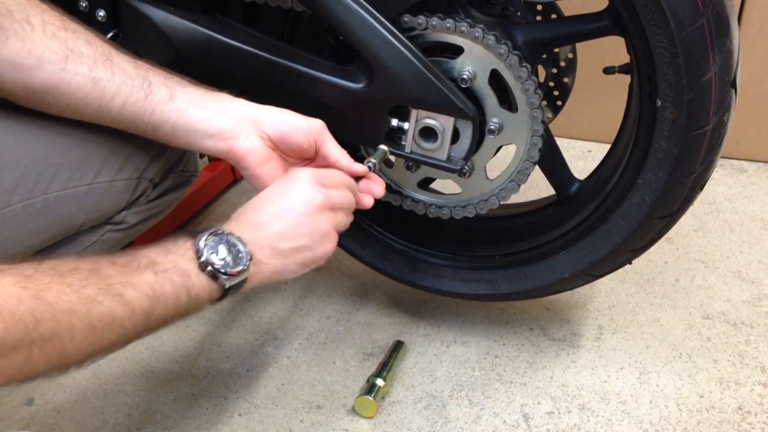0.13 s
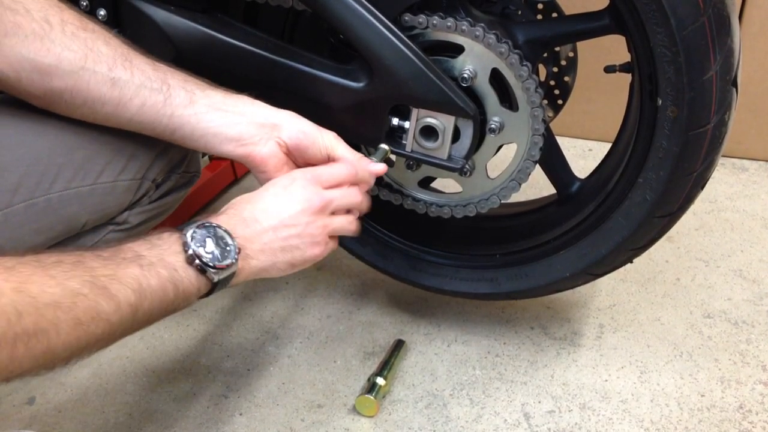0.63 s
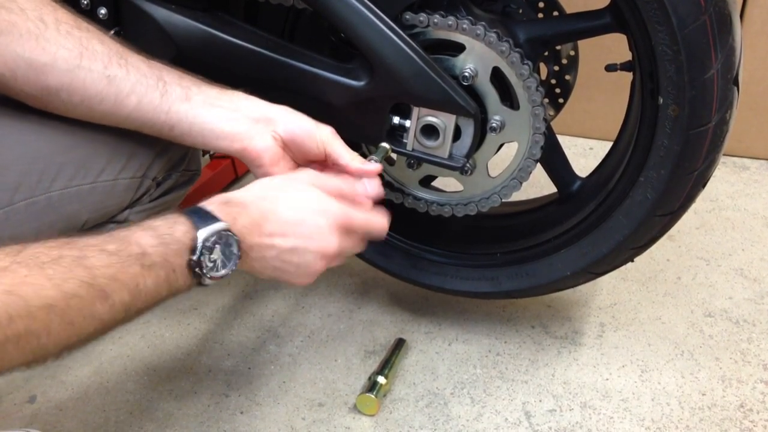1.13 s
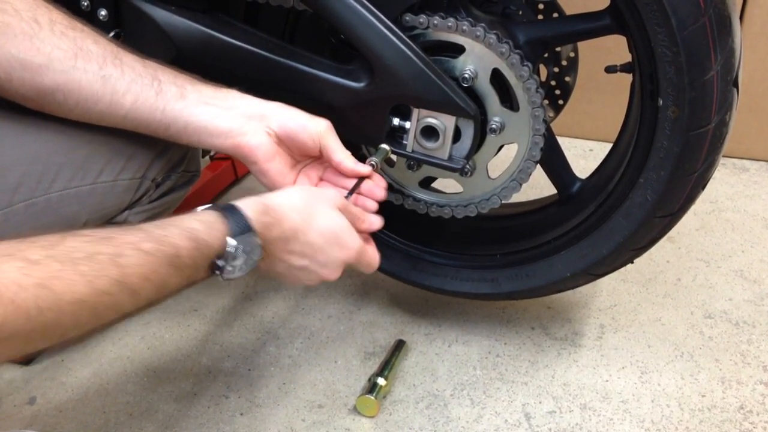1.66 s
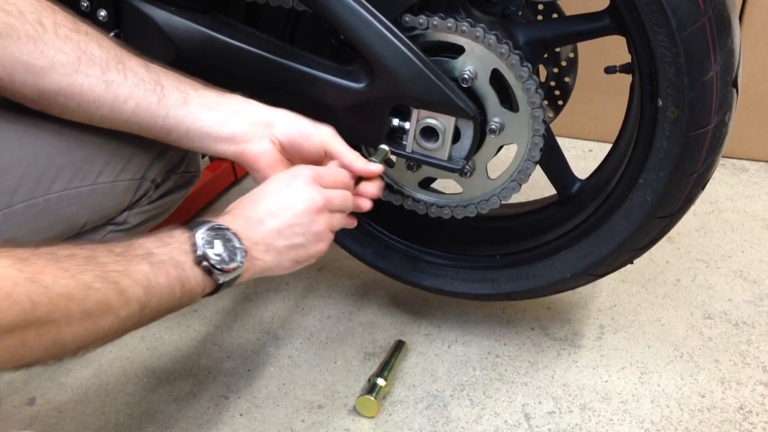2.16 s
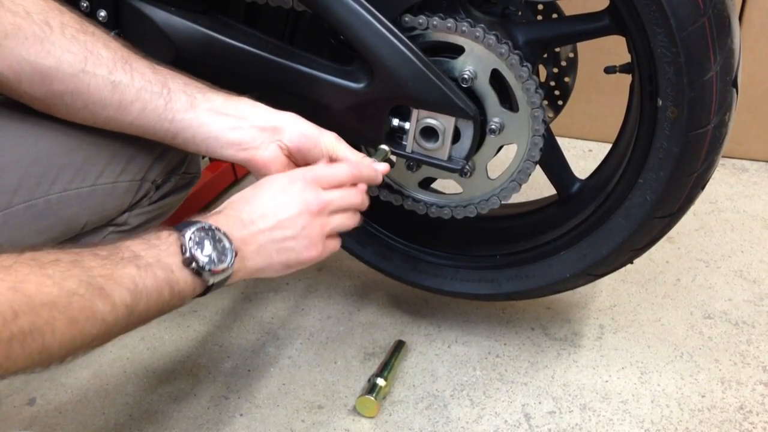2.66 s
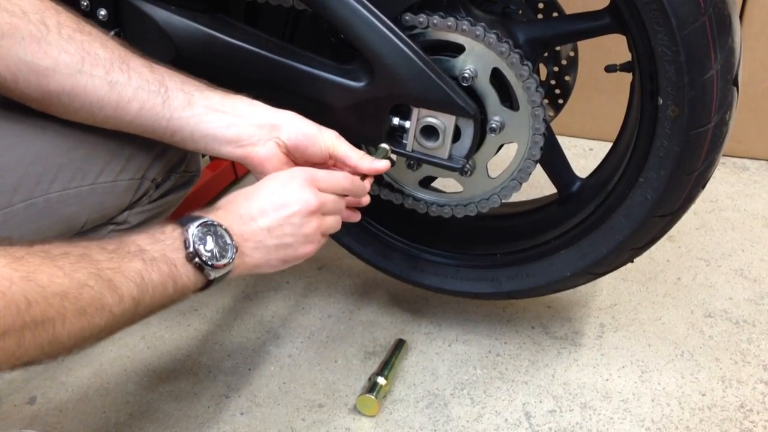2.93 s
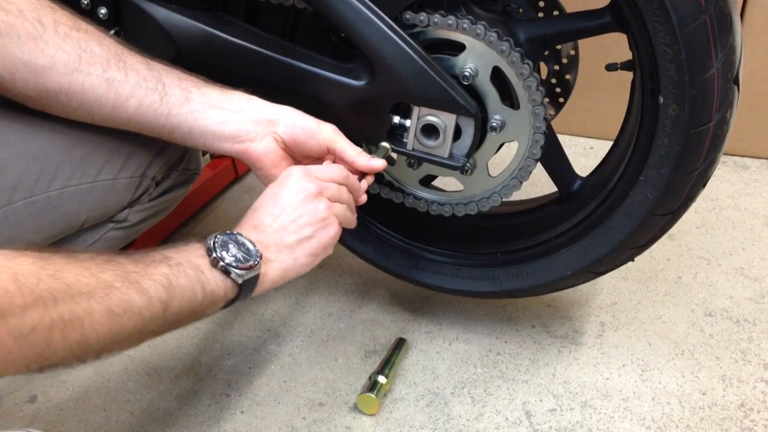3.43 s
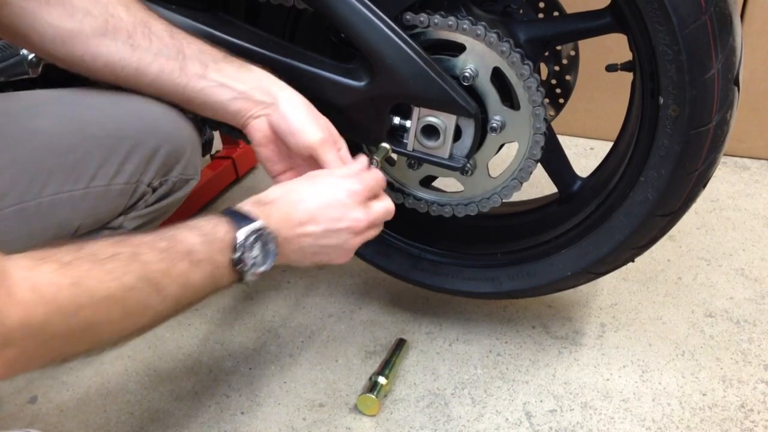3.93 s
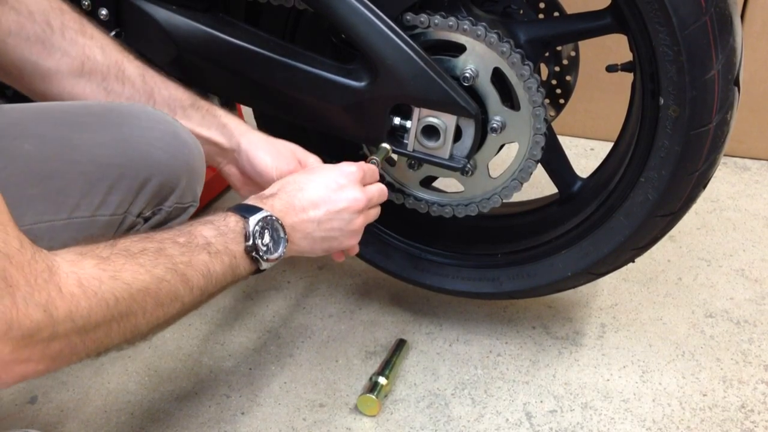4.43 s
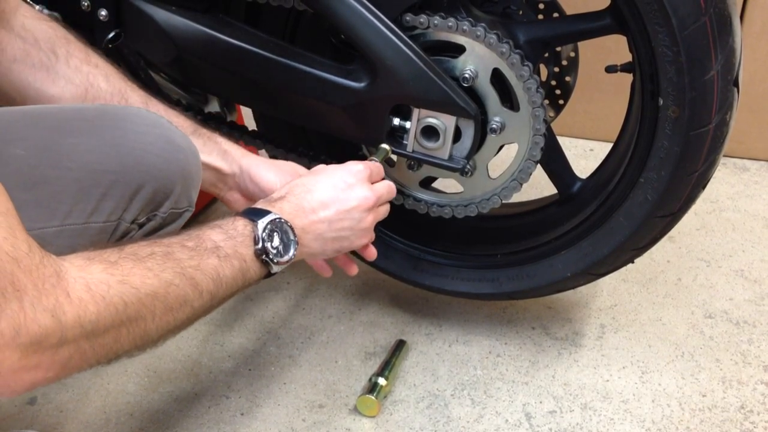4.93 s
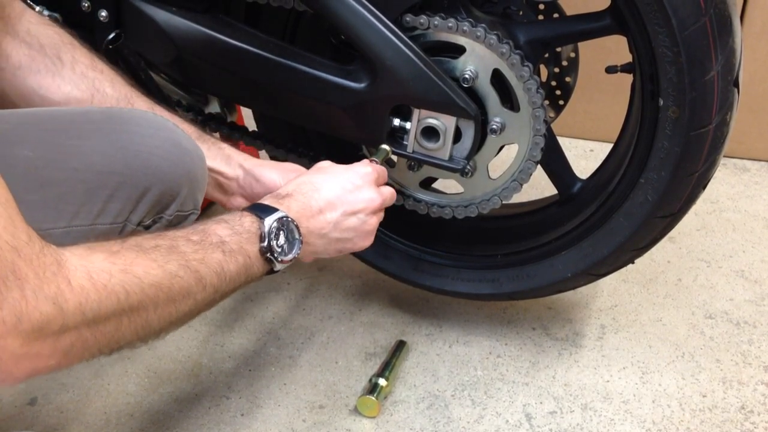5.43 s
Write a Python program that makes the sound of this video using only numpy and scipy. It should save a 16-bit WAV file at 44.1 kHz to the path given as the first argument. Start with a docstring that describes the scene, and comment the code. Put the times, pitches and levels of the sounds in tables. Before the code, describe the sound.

In a quiet hard-walled workshop, about a metre from the microphone, fingers screw a small steel fitting into a motorcycle's rear arm. Tiny bright knocks and scraping chatter come in uneven bursts for over three seconds. A brief gritty shoe scuff interrupts, followed by soft cloth, a very faint metal slide, sparse ticks and dull hand bumps, above soft rumble and hiss.

```python
"""Fingers screw a small steel adapter into a motorcycle's rear arm in a workshop, a metre from the microphone.
The loose thread knocks, rubs and grinds: chatter and uneven slips drive decaying modes of the steel.
Hands bump softly and metal slides faintly, made of filtered noise; a shoe scuffs the concrete and cloth
slides, as noise with crackling levels. Hard walls give a short diffuse tail over a quiet hum of shaped noise."""
import sys
import numpy as np
from scipy import signal
from scipy.fft import rfft, irfft
from scipy.io import wavfile
from scipy.ndimage import uniform_filter1d

SR = 44100
rng = np.random.default_rng(int(sys.argv[2]) if len(sys.argv) > 2 else 0)


def dump(signal):
    """Clip the signal to [-1, 1] and save it as 16-bit WAV at the path in sys.argv[1]."""
    limited = np.clip(np.atleast_2d(signal).T, -1, 1)
    pcm = np.round(limited * 32767).astype(np.int16)
    wavfile.write(sys.argv[1], SR, pcm)


def convert_level_to_amplitude(level_db):
    """Map a level in decibels to its linear amplitude factor."""
    exponent = np.asarray(level_db, float) / 20
    return 10 ** exponent


N = 245460  # samples

# Knocks of the loose thread. Each row: start in seconds, low ring level in dB before the bass cut,
# middle ring in dB over low, upper ring in dB over low, rattle time in ms.
THREAD_KNOCKS = [(0.156,-35.5,-4,-18,5.6), (0.3214,-66.5,2.5,6.5,11.5), (0.594,-51,3.5,16,12),
                 (1.1585,-38,-1.5,-2.5,8.5), (1.468,-63,6,6.5,6), (1.7626,-53.5,2.5,2,11.3),
                 (1.8512,-44.5,6.5,2.5,12.6), (1.8676,-38,7,6.5,7.8), (2.2215,-57,8,0,10),
                 (2.230,-40,6.5,8,8.3), (2.4188,-29.5,3,-2,6.9), (2.574,-41.5,-4.5,2,8.2),
                 (2.9143,-52,-3.5,-27,13), (3.2737,-46,-3.5,-8,7.9), (3.6256,-36.5,-18.5,-14.5,13.3)]
# Short rubs of the thread that swell and fade. Each row: as for the knocks, but with swell time in ms.
THREAD_RUBS = [(0.3849,-59.5,-5.5,-24,3.8), (0.458,-56.5,0.5,-2,23), (0.4864,-49,2.5,-4.5,3.9),
               (0.570,-46,-3.5,-30,14), (0.6032,-50.5,5.5,9,3.5), (0.768,-53,-3.5,-14.5,7.1),
               (0.9163,-54.5,-4,-9.5,7.1), (1.0294,-56,-8,-23,5.3), (1.097,-44.5,-3,-7.5,14.1),
               (1.1364,-40,-2.5,-17,8.8), (1.1741,-44.5,4.5,-2.5,5.3), (1.2171,-46.5,-0.5,-13,11.5),
               (1.259,-45.5,4.5,-5,6.3), (1.6172,-51.5,-1,-8.5,6.3), (1.722,-60,-1,-10,4.6),
               (1.834,-38.5,-4.5,-10.5,16.3), (1.8746,-32,-6,-2,4.1), (1.9481,-46.5,5,3,8),
               (2.0279,-46,-4.5,-11,6.9), (2.208,-47,1,-24,17), (2.5433,-43.5,-5,-11,9.3),
               (2.622,-52,5.5,-5,3), (2.6614,-56.5,6.5,-2,4.7), (2.758,-53.5,-4.5,-32,6.7),
               (3.054,-40,-3,-2.5,4.7), (3.6687,-59,-27,-30,3.5), (4.288,-51.5,4,-34,5.2),
               (4.4,-40.5,-6,-46,9.8), (4.993,-48.5,0.5,-29,5.3), (5.0086,-42,-5,-35,2.4),
               (5.0569,-44.5,-15,-30,5.4), (5.118,-54.5,-12,-31,6.4)]
# Modes of adapter and arm. Each row: frequency in Hz, least width in Hz, relative level in dB.
STEEL_MODES = [(1220, 160, -10), (1206, 46, -0.5), (1272, 45, 11.5), (1344, 50, -2), (1430, 25, 8.5),
               (1498, 34, -3.5), (1998.3, 146, 2.5), (2660, 24, 13), (2870, 32, -1.5), (3010, 23, 0),
               (4320, 44, -11), (4404, 50, 19.5), (5930, 110, 0), (8730, 280, 3), (11830, 130, -6)]
# Modes that a touch drives together: low, middle, upper, topmost. Each row: modes from Hz, modes to Hz,
# crack from Hz, crack to Hz.
MODE_GROUPS = [(900, 2000, 1050, 1750), (2000, 3700, 2250, 3350), (3700, 7800, 3700, 7800),
               (7800, 15500, 7800, 13800)]
# Finger turns that grind the thread. Each row: most pressure in seconds, rise in seconds per 20 dB,
# fall in seconds per 20 dB, low ring level in dB before the bass cut, upper ring in dB over low.
FINGER_TURNS = [(0.56, 0.35, 0.3, -70.5, 2), (0.99, 0.23, .2, -61.5, -12), (1.2, 0.13, 0.27, -55.5, -12),
                (1.84, .13, 0.1, -58.5, -7), (1.92, 0.07, 0.1255, -49.5, -2), (2.32, 0.15, .15, -66, 1),
                (2.46, 0.05, 0.28, -51.5, -15), (3.21, .26, 0.03, -61, -24), (4.39, 0.25, 0.3, -65.5, -16)]
# Soft low bumps of the hands. Each row: start in seconds, peak in dB, centre in Hz, time constant in ms.
HAND_BUMPS = [(0.603, -49, 510, 11.6), (1.872, -42.5, 566, 11), (2.227, -48.5, 680, 19),
              (4.55, -53.5, 290, 14.5), (4.931, -56, 306, 9.3), (5.12, -47.5, 620, 8.6),
              (5.356, -61, 218, 15)]
# Thin lines in a faint slide of metal. Each row: frequency in Hz, width in Hz, relative level in dB.
SLIDE_MODES = [(2170, 240, -3), (2800, 160, 0), (3270, 200, -4), (5500, 300, -9)]
# Shoe dragged on concrete. Each row: time in seconds, mean thud level in dB, mean grit level in dB.
SHOE_DRAG = [(3.735, -60, -56), (3.753, -35.5, -37), (3.795, -37, -46), (3.955, -70, -63), (4.1, -79, -70)]
# Tone of the sole's thuds. Each row: frequency in Hz, relative level in dB per Hz.
SOLE_TONE = [(29, -41), (50, -16), (178, -6.5), (208, -6), (307, -15.5), (377, -11), (548, -14.5),
             (657, -21), (900, -48), (1170, -50), (1980, -120)]
# Tone of the grit under it. Each row: frequency in Hz, relative level in dB per Hz.
GRIT_TONE = [(470, -18), (800, 1.5), (2320, 1), (2940, -5), (3250, 0), (3630, -7.5), (10200, -18.5),
             (15500, -25)]
# Cloth sliding as the body settles. Each row: time in seconds, mean level in dB.
CLOTH_SLIDE = [(3.85, -71), (3.952, -65.5), (4.468, -75), (4.6, -82)]
# Decay of the workshop's tail. Each row: frequency in Hz, time to fall 60 dB in seconds.
ROOM_DECAY = [(150, 0.49), (600, 0.35), (1500, 0.37), (4000, 0.34), (9000, 0.11), (15000, 0.3)]
# Tone of the background hum. Each row: frequency in Hz, relative level in dB per Hz.
HUM_TONE = [(12, -34), (20, -33), (53, 3), (81, 3), (210, -6), (285, -4), (446, -9), (1060, -9.5),
            (1190, -13), (1860, -18.5), (2670, -17), (3740, -22), (14700, -28.5), (16000, -34)]
# Slow swell of the low rumble. Each row: time in seconds, gain in dB.
RUMBLE_SWELL = [(0.0, -2.5), (1.1, 1), (2.5, 2.5), (3.4, -1.5), (3.86, 3.5), (5.57, -1)]


def unit(x):
    """Scale to rms 1."""
    return x / np.sqrt(np.mean(x ** 2) + 1e-30)


def colour(x, points):
    """Shape a spectrum by (Hz, dB) points on a log frequency axis."""
    hz, db = np.transpose(points)
    f = np.maximum(np.arange(len(x) // 2 + 1) * SR / len(x), 1)
    gain = convert_level_to_amplitude(np.interp(np.log(f), np.log(hz), db))
    return irfft(rfft(x) * gain, len(x))


def curve(rows):
    """Levels in dB at every sample, drawn between the rows; -150 dB outside them."""
    s, *columns = np.transpose(rows)
    return [np.interp(np.arange(N) / SR, s, c, -150, -150) for c in columns]


def band(x, lo_hz, hi_hz):
    """Band-pass between two frequencies."""
    return signal.sosfilt(signal.butter(3, [lo_hz, hi_hz], "bandpass", fs=SR, output="sos"), x)


def contacts(shape, spread_db):
    """Tiny collisions: most are faint, a few stand out."""
    return rng.standard_normal(shape) * convert_level_to_amplitude(spread_db * rng.exponential(size=shape))


def walk(rate):
    """Random levels, rate of them per second, smoothed twice into a wandering curve."""
    k = int(SR / rate)
    steps = np.repeat(rng.standard_normal(N // k + 1), k)
    return 1.32 * uniform_filter1d(uniform_filter1d(steps, k), k)[:N]


def knocks():
    """The loose thread strikes almost at once and rattles out."""
    def rattle(u):
        return np.minimum(u / 0.26, 1) * np.exp(-u ** 1.44)
    return touches(THREAD_KNOCKS, rattle, [1.15, 1.2, 4.5, 23], tick_db=-8)


def rubs():
    """The thread rubs briefly: its chatter swells before it fades."""
    def swell(u):
        return u ** 1.6 * np.exp(-u ** 1.4)
    return touches(THREAD_RUBS, swell, [-8.5, -4.5, 2.0, 30], tick_db=-16)


def touches(table, shape, crack_db, tick_db):
    """Brief chatter drives the modes at each touch; shape gives its strength over u, time over the row's ms."""
    out, t = np.zeros(N + 10000), np.arange(3000) / SR
    chances = rng.standard_normal((len(table), 2 * len(STEEL_MODES)))
    chatter = contacts((len(table), len(t)), 1.9)
    for (s, low_db, middle_db, upper_db, ms), chance, noise in zip(table, chances, chatter):
        push = noise * shape(t / (ms / 1000))
        parts = signal.fftconvolve(rings(chance, crack_db), push[None], axes=1)
        # level of each group over its loudest 300 samples (7 ms)
        loud = np.sqrt(uniform_filter1d(parts ** 2, size=300, axis=1).max(axis=1))
        topmost_db = tick_db + 1.3 * upper_db  # the topmost tick follows the upper ring
        level = convert_level_to_amplitude(low_db + np.array([0, middle_db, upper_db, topmost_db]))
        hit = (level / loud) @ parts
        i = int(s * SR)
        out[i:i + len(hit)] += hit
    return out[:N]


def rings(chance, crack_db):
    """Response of the steel to one push, per mode group; grip and contact point shift and weight the modes."""
    hz, width, db = np.array(STEEL_MODES).T[:, :, None]
    t = np.arange(4000) / SR
    weight, detune = chance.reshape(2, -1, 1)
    # a wider mode dies sooner; no mode is narrower than 3.5 % of its frequency
    fade = np.sqrt(width) * np.exp(-np.pi * np.maximum(width, .035 * hz) * t)
    tone = np.sin(2 * np.pi * hz * (1 + .012 * detune) * t)
    modes = convert_level_to_amplitude(db + 3 * weight) * fade * tone
    out = []
    for (lo, hi, crack_lo, crack_hi), crack in zip(MODE_GROUPS, crack_db):
        ring = modes[(hz[:, 0] >= lo) & (hz[:, 0] < hi)].sum(axis=0)
        click = band(1. * (t == 0), crack_lo, crack_hi)  # the many short-lived modes blur into a crack
        out.append(ring / np.linalg.norm(ring) + convert_level_to_amplitude(crack) * click / np.linalg.norm(click))
    return np.array(out)


def grind():
    """Dense uneven slips of the thread drive the modes; each turn presses harder, then lets go."""
    s, rise, fall, low_db, upper_db = np.array(FINGER_TURNS).T[:, :, None]
    since = np.arange(N) / SR - s
    press_db = low_db - 20 * np.where(since < 0, -since / rise, since / fall)
    low = convert_level_to_amplitude(press_db).sum(axis=0)
    upper = convert_level_to_amplitude(press_db + upper_db).sum(axis=0)
    levels = (low, convert_level_to_amplitude(-7.5) * low, upper, convert_level_to_amplitude(-7) * upper)
    slips = unit(contacts(N, 2.5) * convert_level_to_amplitude(3.5 * walk(45)))
    steady = np.zeros(2 * len(STEEL_MODES))  # no shift or change of weight
    out = 0
    for ring, level in zip(rings(steady, [4.0, 7.0, 3.2, 8]), levels):
        out = out + signal.fftconvolve(slips * level, ring / np.linalg.norm(ring))[:N]
    return out


def bumps():
    """Soft bumps of the hands: short bursts of dull, band-limited noise."""
    out, t = np.zeros(N + 4000), np.arange(4000) / SR
    noises = rng.standard_normal((len(HAND_BUMPS), len(t)))
    for (s, db, hz, ms), noise in zip(HAND_BUMPS, noises):
        u = t / (ms / 1000)
        thud = band(noise * u * np.exp(-u ** 2), hz / 1.85, hz * 1.53)
        i = int(s * SR)
        out[i:i + len(t)] += convert_level_to_amplitude(db) * thud / np.abs(thud).max()
    return out[:N]


def slide():
    """Light friction keeps a few modes of metal sounding; the slide swells, holds and dies away."""
    start_s, rise_s, hold_s, fall_s, level_db = 4.04, .08, .12, .35, -72
    push = contacts(N, 1.5) * convert_level_to_amplitude(2 * walk(30))
    lines = 0
    for hz, width, db in SLIDE_MODES:
        lines = lines + convert_level_to_amplitude(db) * unit(band(push, hz - width / 2, hz + width / 2))
    corners = start_s + np.cumsum([0, rise_s, hold_s, fall_s])
    swell = np.interp(np.arange(N) / SR, corners, [0, 1, 1, 0]) ** 2
    return convert_level_to_amplitude(level_db) * unit(lines) * swell


def scuff():
    """The sole bumps along in low thuds while grit crackles under it: two coloured noises of uneven level."""
    thud_db, grit_db = curve(SHOE_DRAG)
    thud = unit(colour(contacts(N, 2.5), SOLE_TONE)) * convert_level_to_amplitude(thud_db + 2.0 * walk(50))
    grit = unit(colour(contacts(N, 2.1), GRIT_TONE)) * convert_level_to_amplitude(grit_db + 0.76 * walk(68))
    return thud + grit


def cloth():
    """Sliding cloth: tiny contacts make a fine airy rustle."""
    rustle = unit(band(contacts(N, 1.6), 2000, 13000))
    return rustle * convert_level_to_amplitude(curve(CLOTH_SLIDE)[0] + 0.5 * walk(28))


def room(x, wet_db=-9, gap_s=0.0011, hold_s=.04, count=6):
    """Hard walls add a diffuse tail, each band decaying at its own rate; moving hands keep changing the paths."""
    t = np.arange(SR // 2) / SR
    hz, t60 = np.transpose(ROOM_DECAY)
    tail = 0
    for f in 63 * 2 ** np.arange(0, 8, .5):  # half-octave bands
        decay_s = np.interp(np.log(f), np.log(hz), t60)
        noise = band(rng.standard_normal((count, len(t))), f, f * np.sqrt(2))
        tail = tail + noise * np.exp(-np.log(1000) * t / decay_s)
    tail = tail * np.clip(t / gap_s, 0, 1) ** 2  # the tail builds up over gap_s
    echo = convert_level_to_amplitude(wet_db) * tail / np.linalg.norm(tail, axis=1, keepdims=True)
    turn = (np.arange(N) / SR / hold_s - np.arange(count)[:, None]) % count
    share = np.sin(np.pi / 2 * np.minimum(turn, 2))  # one path fades in as the last fades out
    wet = signal.fftconvolve(x * share, echo, axes=1)[:, :N].sum(axis=0)
    return x + wet


def hum():
    """Background of shaped noise: even hiss, and a low rumble that swells and wavers."""
    noise = unit(colour(rng.standard_normal(N), HUM_TONE)) * convert_level_to_amplitude(-65)
    low = signal.sosfiltfilt(signal.butter(2, 800, fs=SR, output="sos"), noise)
    s, db = np.transpose(RUMBLE_SWELL)
    swell_db = np.interp(np.arange(N) / SR, s, db) + 2.33 * walk(8.1)
    return noise - low + low * convert_level_to_amplitude(swell_db)


def scene():
    """Thread, hands, shoe and cloth in the room, over the hum; the small parts send out little bass."""
    steel = knocks() + rubs() + grind()
    bass_cut = signal.butter(3, 950, "highpass", fs=SR, output="sos")
    body = convert_level_to_amplitude(-12) * band(steel, 300, 800)  # what the heavy arm adds below the rings
    steel = signal.sosfilt(bass_cut, steel) + body
    near = steel + bumps() + scuff() + cloth() + slide()
    return (room(near) + hum())[None]


def roll_off(x):
    """The treble ends steeply here."""
    return signal.sosfilt(signal.butter(12, 16290, fs=SR, output="sos"), x)


def record(dry):
    """A steep low-pass cuts the top above 15.6 kHz."""
    cut = signal.ellip(8, .2, 60, 15600, fs=SR, output="sos")
    mix = signal.sosfilt(cut, dry)
    return roll_off(mix)


dry = scene()
out = record(dry)
dump(out)
```